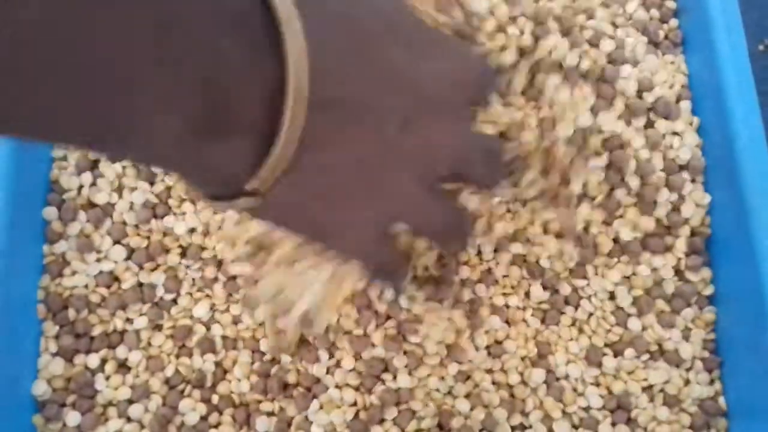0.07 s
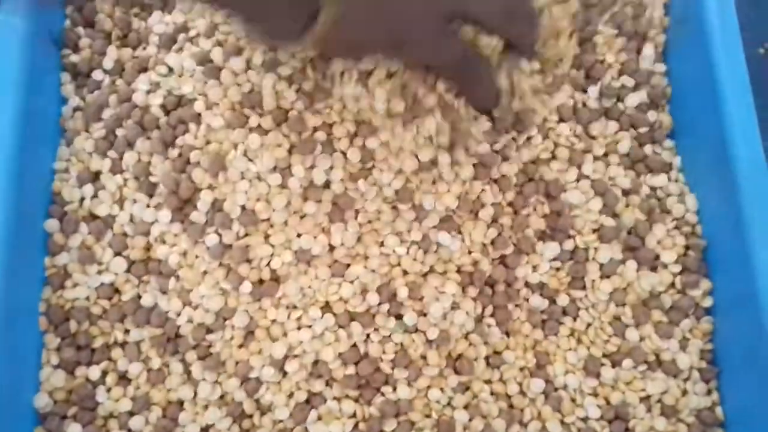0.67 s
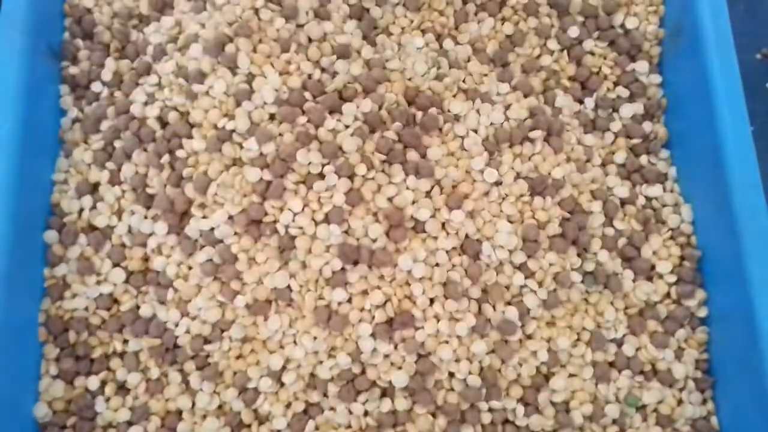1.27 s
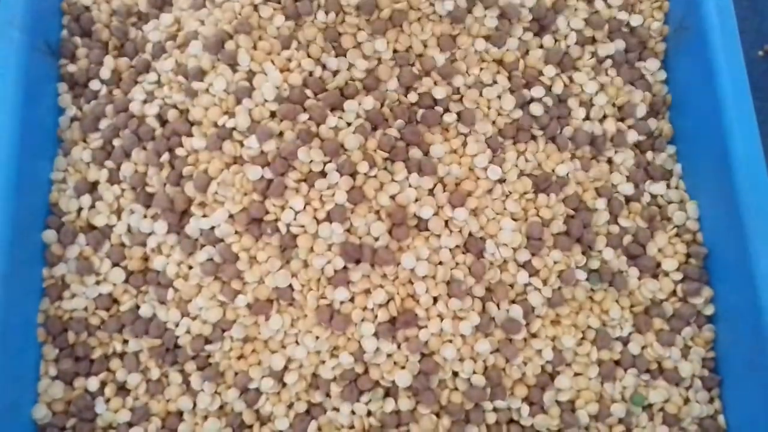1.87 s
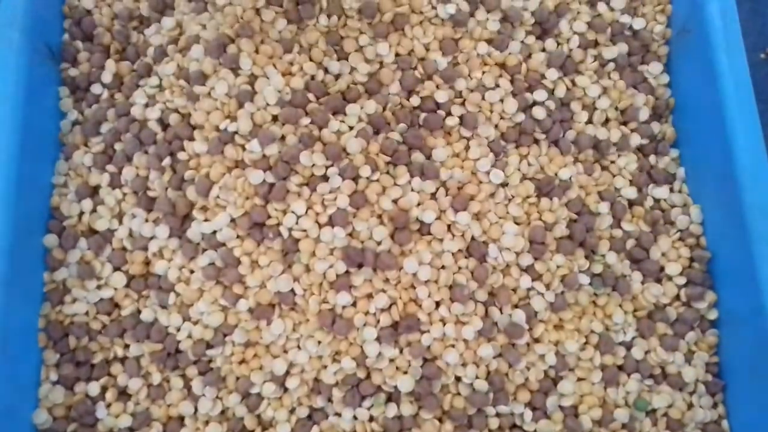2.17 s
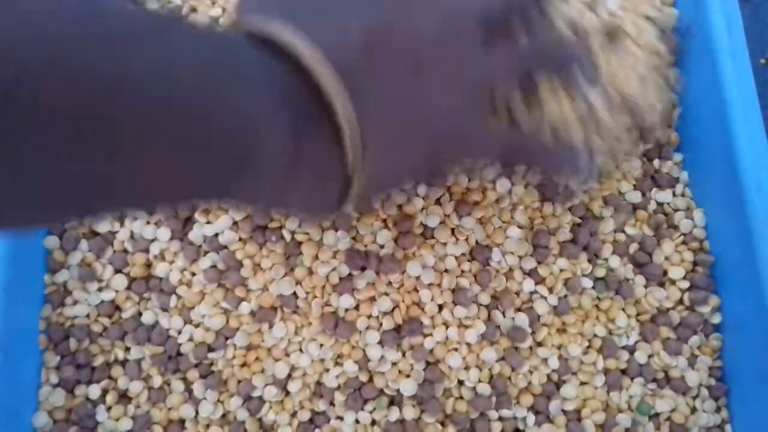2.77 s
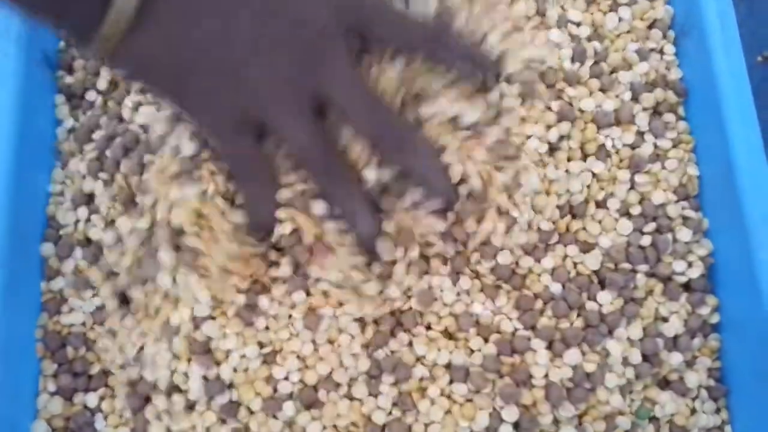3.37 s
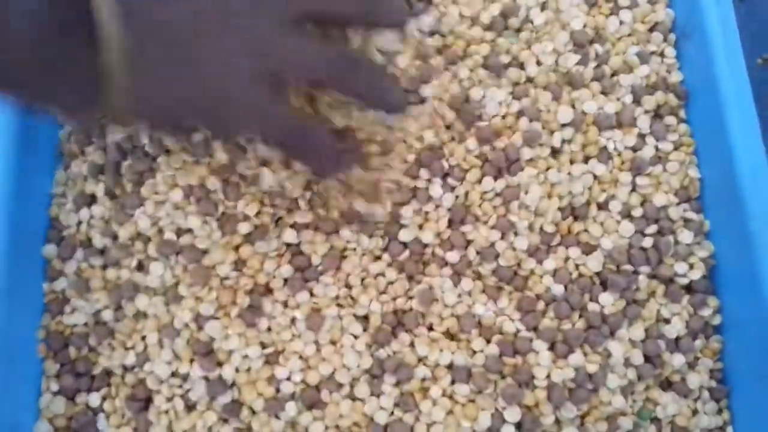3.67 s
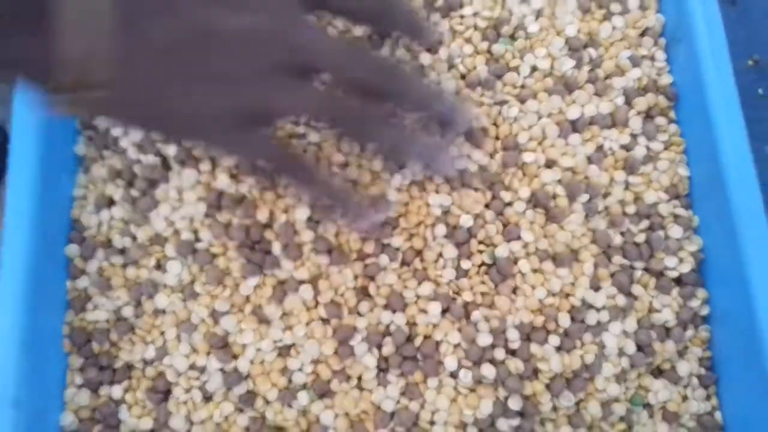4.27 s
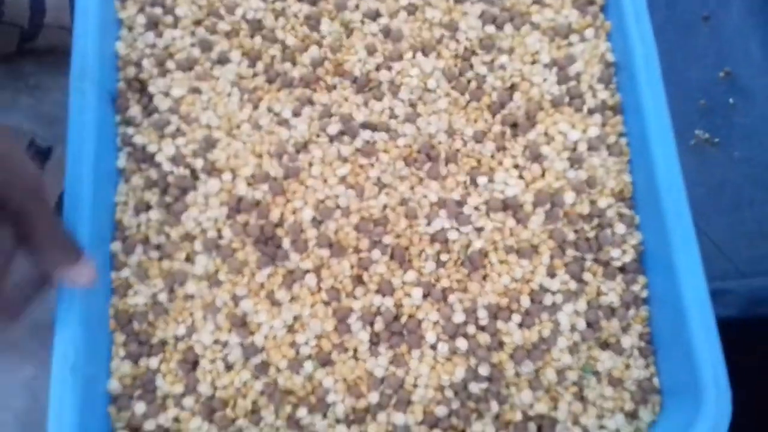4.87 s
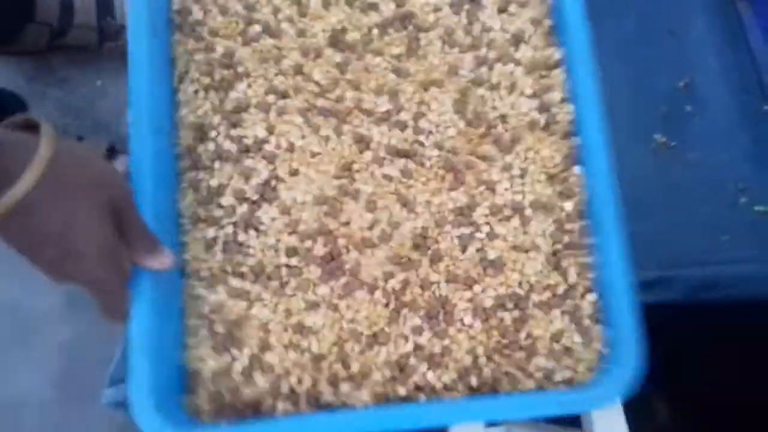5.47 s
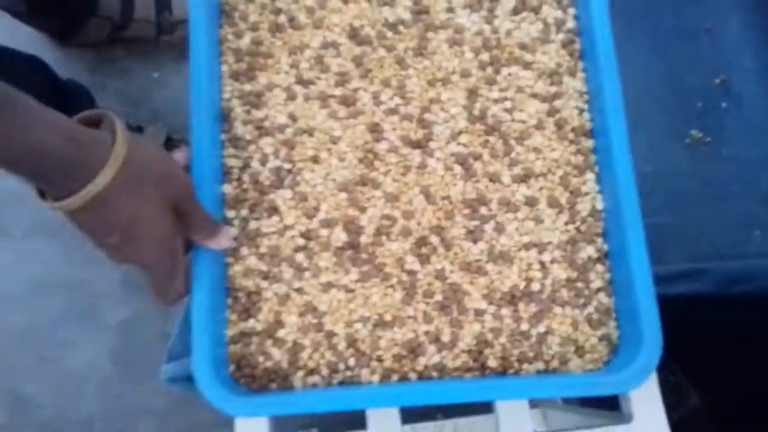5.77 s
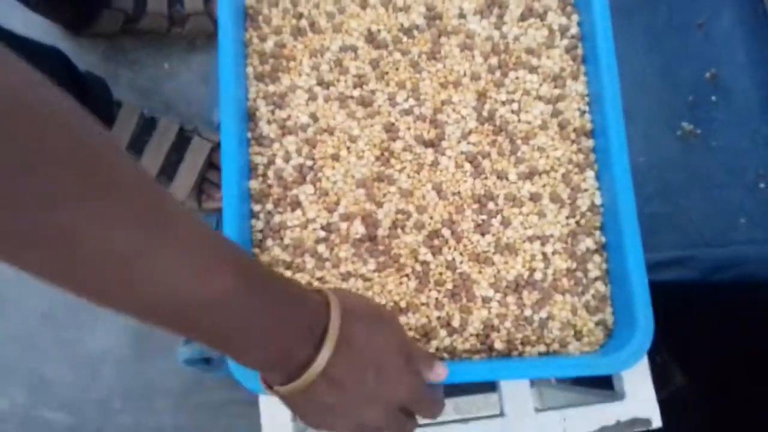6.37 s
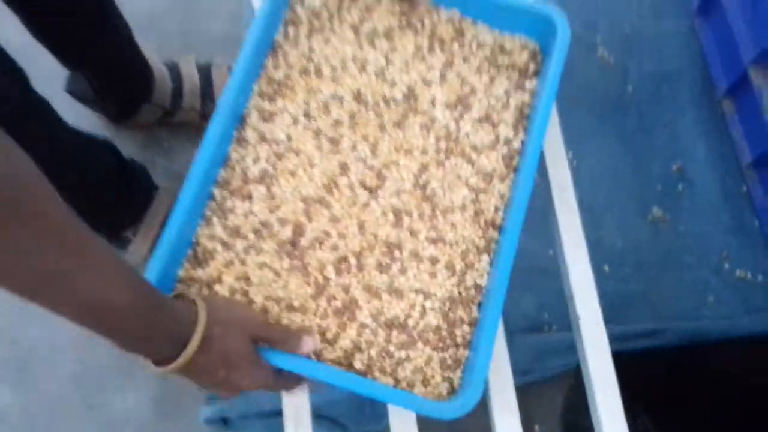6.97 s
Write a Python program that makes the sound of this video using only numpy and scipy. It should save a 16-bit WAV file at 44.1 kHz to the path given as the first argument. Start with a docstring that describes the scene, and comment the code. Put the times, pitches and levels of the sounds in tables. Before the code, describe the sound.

Close, dry grains tick, hiss and crunch as a hand stirs them around a plastic tray, with single grains snapping loose now and then. The stirring eases off, and the tray is jerked back and forth, giving bright rattling surges and a cluster of hollow knocks. The grains settle, then slide once more with a light bump. A faint motor hum and even rush stay in the background.

```python
"""Split pulses in a plastic tray

A hand rakes through dried split pulses, then grips the tray, shakes it and drags it away.
Thousands of tiny contacts tick on the surface, crunch under pressure and sound through the tray floor.
Single pulses snap loose, the tray bumps on its stand, and a machine drones faintly behind."""
import sys
import numpy as np
from scipy import signal
from scipy.fft import rfft, irfft, next_fast_len
from scipy.io import wavfile
from scipy.ndimage import uniform_filter1d, map_coordinates

SR = 44100
rng = np.random.default_rng(int(sys.argv[2]) if len(sys.argv) > 2 else 0)


def to_wav(s):
    """Save 16-bit WAV."""
    ch = np.atleast_2d(s).T  # columns
    pcm = np.round(np.clip(ch, -1, 1) * 32767)  # PCM
    wavfile.write(sys.argv[1], SR, pcm.astype(np.int16))


N = 318402


def amp(db):
    """Decibels to gain."""
    return 10 ** (np.asarray(db) / 20)


def unit(x):
    """Scale to rms 1."""
    return x / np.sqrt(np.mean(x ** 2) + 1e-20)


def over_time(points):
    """(time, value) points read at every sample."""
    return np.interp(np.arange(N) / SR, *np.transpose(points))


def over_hz(points, hz):
    """(frequency, value) points read on a log axis."""
    knots_hz, values = np.transpose(points)
    return np.interp(np.log(hz + 1), np.log(knots_hz), values)


def wobble(knots_per_s):
    """A smooth random curve."""
    knots = rng.standard_normal(int(N * knots_per_s / SR) + 4)
    return map_coordinates(knots, [np.arange(N) * knots_per_s / SR])


def filtered(x, response):
    """x through a complex frequency response."""
    size = next_fast_len(N + SR // 2)
    return irfft(rfft(x, size) * response(np.fft.rfftfreq(size, 1 / SR)), size)[..., :N]


def coloured(x, colour, size=4096):
    """x through a minimum-phase filter of energy 1."""
    cepstrum = irfft(np.log(amp(over_hz(colour, np.fft.rfftfreq(size, 1 / SR)))))
    cepstrum[1:size // 2] *= 2
    cepstrum[size // 2 + 1:] = 0
    response = irfft(np.exp(rfft(cepstrum)))
    return signal.fftconvolve(x, response / np.linalg.norm(response))[:len(x)]


def add(track, start_s, sound):
    """Mix a sound into the track."""
    part = track[round(start_s * SR):][:len(sound)]
    part += sound[:len(part)]


def contacts(per_s, spread_db):
    """Randomly timed impacts of uneven size; rms 1."""
    chance = np.clip(per_s / SR, 0, 1)
    size = amp(spread_db * np.clip(rng.standard_normal(N), -2, 2)) * rng.choice([-1, 1], N)
    return unit((rng.random(N) < chance) * size / np.sqrt(chance))


def bursts(per_s, spread_db, t60_s):
    """Envelope of random sudden starts that each die away; rms 1."""
    t = np.arange(SR // 8) / SR
    energy = signal.fftconvolve(contacts(per_s, spread_db) ** 2, amp(-60 * t / t60_s) ** 2)[:N]
    return unit(np.sqrt(np.abs(energy)))


def push(start_s, rise_s, hold_s, settle_db_per_s):
    """Power of one move: the pulses speed up, keep moving, then settle."""
    t = np.arange(N) / SR - start_s
    settling = amp(-settle_db_per_s * np.maximum(t - rise_s - hold_s, 0))
    return (np.clip(t / rise_s, 0, 1) * settling) ** 2


# Hand strokes; deep ones crunch and reach the tray floor, shallow ones only tick:
# (start [s], rise [s], hold [s], settling [dB/s], tick drive [dB], crunch re tick [dB],
#  floor re tick [dB], packing [0 loose, 1 tight], hollow [Hz], hollow boost [dB])
STROKES = [(0.0, 0.00096, 0.084, 54, -28.0, -4.5, -4.5, 0.072, 1290.0, 2.5),
           (0.401, 0.07, 0.1, 108, -21.5, -0.5, -8, 0.042, 1310, 11),
           (0.555, 0.063, 0.042, 35, -26.5, -7, -5, 0.46, 1260, 3),
           (0.733, 0.14, 0.049, 62, -27.0, -8, -5, 0.091, 1320, 1.0),
           (0.91, 0.091, 0.064, 336.0, -30.0, -23, -11, 0.08, 1280, 2.5),
           (1.211, 0.032, 0.0067, 40.0, -23.5, -2.0, -6, 0.2, 1180, 5),
           (1.276, 0.13, 0.14, 95, -23, -1, -4.5, 0.65, 1330.0, 1.5),
           (1.616, 0.057, 0.029, 27, -30.5, -24, -7, 0.4, 1300.0, 3),
           (1.807, 0.033, 0.12, 156, -20.5, -4.5, -9, 0.34, 1300, 3.0),
           (1.89, 0.077, 0.049, 61, -25.0, 2.5, -2.5, 0.66, 1290, 7),
           (1.983, 0.062, 0.044, 172, -22, -3.5, -1, 0.43, 1470, 7),
           (2.158, 0.067, 0.037, 51, -37, 0, 0.5, 0.29, 1250.0, 3.0),
           (2.265, 0.019, 0.036, 127, -27.0, 0.0, -4, 0.5, 1150, 0.5),
           (2.343, 0.073, 0.013, 154, -24.5, 0, 1.5, 0.45, 970, 4),
           (2.448, 0.051, 0.011, 60.0, -30.5, -1.5, 5.5, 0.4, 784, 8),
           (2.511, 0.12, 0.19, 43, -28.5, -13, -9.5, 0.41, 800.0, -1),
           (2.802, 0.052, 0.055, 107, -19.5, -4.5, -11, 0.23, 1290, 12),
           (2.9, 0.059, 0.56, 30, -31.5, -8, -3.5, 0.19, 830, 0.5),
           (3.373, 0.13, 0.11, 64.5, -27, -27, -11.5, 0.05, 1200.0, 10),
           (3.578, 0.041, 0.089, 38, -34, -1.5, 0.5, 0.05, 1170, 6),
           (3.685, 0.15, 0.071, 96, -24.5, -10.5, -4.5, 0.03, 1210.0, 6.5),
           (3.993, 0.049, 0.053, 66, -34.5, -15, -13, 0.024, 1200.0, 0),
           (4.329, 0.095, 0.029, 190.0, -25.5, -11.5, -6, 0.018, 1280.0, 5.5),
           (4.499, 0.038, 0.11, 161, -37, -11.5, -6.5, 0.01, 1200.0, 2)]
# Tray jerks that slide the whole heap: columns as STROKES, the hollow being the tray floor's ring
SHAKES = [(4.947, 0.018, 0.011, 151.0, -43.5, 1.5, 4, 0.89, 1000.0, -3.5),
          (5.039, 0.27, 0.059, 112.0, -28, -5, -1.5, 0.27, 1000.0, 0),
          (5.095, 0.0068, 0.021, 149.5, -36, -15, -21, 0.27, 1000.0, -1.0),
          (5.263, 0.13, 0.015, 295, -25.5, 0.5, -4.5, 0.76, 998, 5.5),
          (5.436, 0.016, 0.012, 145, -16.5, -5.5, -6, 0.2, 1200.0, -0.5),
          (5.474, 0.038, 0.014, 119, -15.5, -6, -5.5, 0.15, 1500.0, -0.0),
          (5.565, 0.038, 0.02, 145, -14.5, -7.5, -6, 0.54, 1790.0, 2.5),
          (5.65, 0.054, 0.058, 51.0, -36.5, 3, 5.5, 0.72, 1790.0, 0.5),
          (6.21, 0.031, 0.071, 176.0, -36.5, -11.5, -15.5, 0.012, 1750.0, -5),
          (6.284, 0.02, 0.014, 80, -41.5, -5, 1, 0.02, 1750.0, -2),
          (6.393, 0.043, 0.029, 115.0, -42.5, -17, -13, 0.02, 1750.0, 8),
          (6.501, 0.16, 0.107, 114, -27.5, -8.5, -6, 0.06, 1660, 5.5),
          (6.806, 0.044, 0.2, 66, -46, -18, -4, 0.1, 1720.0, 9)]
# Trickle between moves: (tick drive [dB], crunch drive [dB], floor drive [dB])
TRICKLE_DB = (-59, -57.5, -56)


def motion():
    """Moves add in power; the strongest dominates the packing, the hollow and the share of sliding."""
    moves = np.array(STROKES + SHAKES)
    tick_db, crunch_db, floor_db, packing, hollow_hz, boost_db = moves[:, 4:].T
    power = np.array([push(*move[:4]) for move in moves]) + 1e-12
    gains = amp([tick_db, tick_db + crunch_db, tick_db + floor_db]) ** 2
    drives_db = 10 * np.log10(gains @ power + amp(TRICKLE_DB)[:, None] ** 2)

    def blend(values, weights):
        return (values * weights) @ power / (weights @ power)

    tick, crunch, floor = gains
    is_shake = np.arange(len(moves)) >= len(STROKES)
    return (drives_db, np.clip(blend(packing, crunch), 0, 1),
            blend(hollow_hz, floor), blend(boost_db, floor), blend(is_shake, tick))


def wandering(x, depth_db):
    """Spectral peaks and dips drift at random as the contacts move about the tray; rms 1."""
    spectra = signal.stft(x, nperseg=512)[2]
    drift = rng.standard_normal(spectra.shape)
    for size, axis in (3, 0), (18, 1), (8, 1):  # smooth over frequency, then twice over time
        drift = uniform_filter1d(drift, size, axis)
    return unit(signal.istft(spectra * amp(depth_db * unit(drift)), nperseg=512)[1][:N])


def hollow(x, centre_hz, boost_db):
    """A broad resonance that moves with the hand; rms 1."""
    hz, frames_s, spectra = signal.stft(x, SR, nperseg=256)
    t = np.arange(N) / SR
    octaves = np.log2((hz[:, None] + 1) / np.interp(frames_s, t, centre_hz))
    gain_db = np.interp(frames_s, t, boost_db) * (np.exp(-(octaves / 0.44) ** 2) - 0.72)
    return unit(signal.istft(spectra * amp(gain_db), SR, nperseg=256)[1][:N])


# Spectra of the contacts: (frequency [Hz], level [dB])
SURFACE_TICK = [(1000, -43), (3000, -32), (5500, -20.5), (6500, -13.5), (7300, -5), (8150, 0), (9300, -5),
                (10700, -15), (12500, -18), (14500, -22), (15800, -25.5)]
LOOSE_CRUNCH = [(500, -35), (1500, -17), (2200, -10), (3000, -8), (3650, 0), (4200, -.5), (5000, -5.5),
                (5900, -6.5), (8000, -6), (11000, -18), (16000, -28)]
PACKED_GRIND = [(500, -51.5), (1200, -11), (1750, -2), (2300, 0.5), (2750, -0.5), (3500, -4.5), (4300, -1),
                (5500, -27.5), (8000, 5.5), (11000, -17.5), (16000, -45)]
TRAY_FLOOR = [(40, -65), (110, -51), (250, -17), (450, -11), (740, -0.5), (920, -5), (1200, -0.5),
              (1480, -2.5), (1700, -1), (2300, -4), (2900, -15.5), (5000, -14.5), (16000, -93)]
HEAP_RUMBLE = [(40, -39), (100, -11.5), (180, -9), (280, 0.5), (400, 3.5), (560, 5.5), (800, -2),
               (2000, -53)]
# Sliding heap re raked heap: (frequency [Hz], gain [dB])
SLIDE_EQ = [(150, 2), (400, -3), (750, -2.5), (1200, -2), (1900, 0.5), (3200, 3), (5800, 2.5), (8300, 0.5),
            (11000, -3.5), (15000, -4.5)]


def heap():
    """The moving pulses: more motion means more contacts, and they come in small avalanches."""
    (tick_db, crunch_db, floor_db), packing, hollow_hz, boost_db, sliding = motion()
    activity = amp(0.4 * (tick_db + 30))
    jolt = spray()
    avalanches = unit(6 + 0.5 * bursts(per_s=120, spread_db=12, t60_s=0.049))
    # pressure lifts hard impacts, each jostling its neighbours, out of the fine patter
    impacts = bursts(per_s=650 * activity, spread_db=6.5, t60_s=0.02) * rng.standard_normal(N)
    pressure = np.clip(0.45 + 0.0081 * (crunch_db + 9), 0.1, 0.9)

    def layer(colour, base_per_s, hardness, drift_db):
        hard_share = np.clip(pressure * hardness, 0, 1)
        patter = contacts(base_per_s * activity, spread_db=1)
        excitation = np.sqrt(hard_share) * impacts + np.sqrt(1 - hard_share) * patter
        return wandering(coloured(excitation, colour), drift_db)

    ticking = layer(SURFACE_TICK, base_per_s=7000, hardness=1, drift_db=0.96)
    ticking *= np.hypot(amp(tick_db + 1.5), 0.47 * jolt)
    loose = layer(LOOSE_CRUNCH, base_per_s=5000, hardness=0.84, drift_db=2.5)
    packed = layer(PACKED_GRIND, base_per_s=3000, hardness=1, drift_db=2.5)
    crunch = np.sqrt(1 - packing) * loose + 1.11 * np.sqrt(packing) * packed
    crunch *= np.hypot(amp(crunch_db + 0.66), 0.5 * jolt)
    floor = layer(TRAY_FLOOR, base_per_s=3000, hardness=0.77, drift_db=1.5)
    floor = hollow(floor, hollow_hz, boost_db) * np.hypot(amp(floor_db - 0.89), 0.22 * jolt)
    rumble = layer(HEAP_RUMBLE, base_per_s=1500, hardness=0.49, drift_db=0)
    rumble *= amp(0.45 * floor_db - 30.5)  # the shifting mass: grows more slowly than the rattle
    raked = avalanches * (ticking + crunch + floor + rumble) + strays(tick_db) + skitter(tick_db)
    slid = filtered(raked, lambda hz: amp(over_hz(SLIDE_EQ, hz)))
    return (1 - sliding) * raked + sliding * slid


# Spectrum of one hard-struck pulse: (frequency [Hz], level [dB])
CLICK_COLOUR = [(200, -25), (1200, -7), (3800, -3), (5600, -7), (8400, 0), (11000, -10), (16000, -22)]


def strays(tick_db):
    """Now and then one pulse strikes much harder than the rest."""
    strikes = bursts(per_s=36, spread_db=3, t60_s=0.007) * rng.standard_normal(N)
    return amp(tick_db - 14.5) * coloured(strikes, CLICK_COLOUR)


# Spectrum of skipping pulses: (frequency [Hz], level [dB])
SKITTER_COLOUR = [(1000, -45), (5000, -28), (8500, 3), (11000, 2), (14000, -3), (16000, -12)]


def skitter(tick_db):
    """Loose pulses skip over the surface, most audibly as the heap settles."""
    skips = bursts(per_s=130, spread_db=4, t60_s=0.005) * rng.standard_normal(N)
    return amp(0.61 * tick_db - 29) * coloured(skips, SKITTER_COLOUR)


# Motor tones, boom spectrum, rush spectrum: (frequency [Hz], level [dB])
HUM_TONES = [(181, -67), (240.5, -59)]
BOOM_COLOUR = [(25, -38), (50, -41), (76, 1.5), (88, -3), (102, 4.5), (130, -5), (250, -21), (1000, -68)]
RUSH_COLOUR = [(25, -29), (50, -28), (90, -22), (160, -0.5), (230, -3), (320, -8.5), (700, -7),
               (1300, -8.5), (2300, -10.5), (3000, -17.5), (5800, -28), (8200, -13), (11000, -31),
               (16000, -31)]
# The boom swells, then fades as the listener backs away; the rush opens up: (time [s], level [dB])
BOOM_FADE = [(0.0, -67.5), (1.7, -57.5), (5.6, -59.5), (7.22, -66)]
RUSH_FADE = [(0, -51.5), (1.5, -47), (4.5, -46.5), (7.2, -45.5)]


def machine():
    """A distant motor: two slightly unsteady tones, a low boom and even rushing."""
    t = np.arange(N) / SR
    hum = np.zeros(N)
    for hz, db in HUM_TONES:
        peak = np.sqrt(2) * amp(db + 2 * wobble(4.8))
        hum += peak * np.sin(2 * np.pi * hz * t + 0.7 * wobble(7))
    boom = amp(over_time(BOOM_FADE) - 2) * coloured(rng.standard_normal(N), BOOM_COLOUR)
    rush = amp(over_time(RUSH_FADE)) * coloured(rng.standard_normal(N), RUSH_COLOUR)
    return hum + boom + rush


# The hand lands in the heap or jerks it: (time [s], spray drive [dB])
JOLTS = [(0.411, -18.5), (1.215, -23.5), (1.812, -21), (2.259, -16), (2.823, -20), (4.336, -40),
         (6.221, -42), (6.535, -35)]


def spray(t60_s=0.25):
    """Envelope of the jolts: each sets many pulses moving at once; they soon come to rest."""
    envelope, t = np.zeros(N), np.arange(SR // 5) / SR
    for start_s, db in JOLTS:
        add(envelope, start_s, amp(db - 60 * t / t60_s))
    return envelope


# Single loud clicks: (time [s], relative peak [dB])
SNAPS = [(0.483, -16), (0.5493, -15.5), (0.6516, -10.5), (1.3467, -12), (1.4906, -18), (1.943, -6),
         (1.9644, -9), (1.9921, -4), (2.3507, -11), (2.7754, -20), (2.8843, -11), (4.822, -32),
         (5.1123, -24), (5.1973, -15), (5.4311, -13)]


def snaps(t60_s=0.0035):
    """Single pulses snap loose or hit the wall."""
    track, t = np.zeros(N), np.arange(SR // 40) / SR
    for start_s, db in SNAPS:
        click = coloured(rng.standard_normal(len(t)) * amp(-60 * t / t60_s), CLICK_COLOUR)
        add(track, start_s, amp(db + 6.5) * click / np.abs(click).max())
    return track


# Tray against stand: (time [s], knock peak [dB], thud peak [dB], crack gain [dB])
BUMPS = [(4.973, -24, -26, -27), (5.134, -20, -42, -33), (5.156, -14, -30, -22), (5.254, -11, -32, -34),
         (5.432, -11, -28, -23), (5.523, -14, -29, -22), (6.537, -23, -44, -35)]
# Spectrum of knocked plastic: (frequency [Hz], level [dB])
KNOCK_COLOUR = [(30, -48), (110, -18), (250, -7), (550, -2), (1000, -.5), (1650, -.5), (2100, -7),
                (2900, -19), (8000, -35), (16000, -50)]


def bumps(blow_t60_s=0.016, clatter_t60_s=0.08):
    """The tray hits its stand: a dry knock and sharp crack with a short clatter, over a hollow thud."""
    track, t = np.zeros(N), np.arange(SR // 6) / SR
    envelope = amp(-60 * t / blow_t60_s) + amp(-22 - 60 * t / clatter_t60_s)
    for start_s, knock_db, thud_db, crack_db in BUMPS:
        blow = rng.standard_normal(len(t)) * envelope
        knock = coloured(blow, KNOCK_COLOUR)
        knock *= amp(knock_db) / np.abs(knock).max()
        crack = amp(crack_db) * coloured(blow, LOOSE_CRUNCH)
        add(track, start_s, knock + crack + amp(thud_db) * thud(t))
    return track


# Tray modes: (frequency [Hz], relative level [dB], t60 [s])
TRAY_MODES = [(144, -2, 0.029), (204, -8, 0.096), (276, -2, 0.1), (372, -24, 0.063), (419, 4, 0.049),
              (544, -2, 0.029)]


def thud(t, rise_s=0.003):
    """The tray's damped low modes swell under a soft blow, at new strengths each time; peak 1."""
    ring = np.zeros(len(t))
    for hz, db, t60_s in TRAY_MODES:
        decay = amp(db + rng.normal(0, 2) - 60 * t / t60_s)
        ring += decay * np.sin(2 * np.pi * (hz * t + rng.random()))
    ring *= (1 - np.exp(-t / rise_s)) ** 2
    return ring / np.abs(ring).max()


def scene():
    """Tray and machine, both central."""
    sound = heap() + snaps() + bumps() + machine()
    return np.array([sound, sound])


def treble_dip(hz, centre_hz=8000):
    """Response of two stacked notches, confined to the band around them."""
    response = 1
    for width_hz, depth in (800, 0.45), (1500, 0.24):
        damping = 1j * hz * width_hz
        response *= 1 - depth * damping / (centre_hz ** 2 - hz ** 2 + damping)
    return response ** np.exp(-((hz - 8100) / 1700) ** 4)


def record(dry, ceiling=0.85, low_cut_hz=34, top_hz=15780):
    """Peaks are rounded, the left treble dips, and the microphone loses the deepest bass and the top."""
    left, right = dry / (1 + (dry / ceiling) ** 6) ** (1 / 6)
    stereo = np.array([filtered(left, treble_dip), right])
    return filtered(stereo, lambda hz: hz ** 2 / np.hypot(hz ** 2, low_cut_hz ** 2) * (hz < top_hz))


dry = scene()
out = record(dry)
to_wav(out)
```